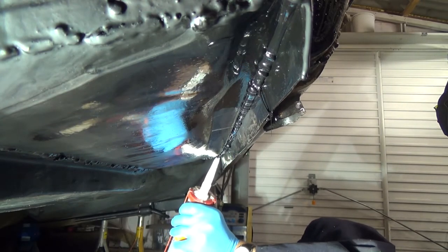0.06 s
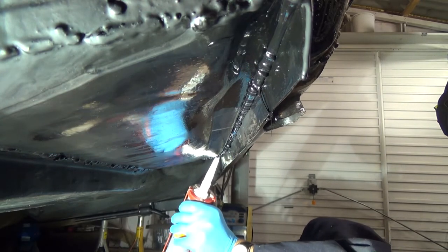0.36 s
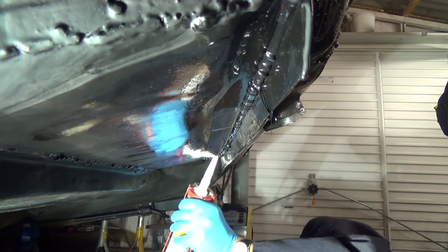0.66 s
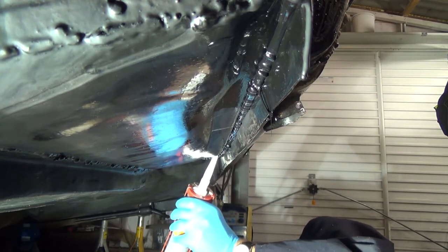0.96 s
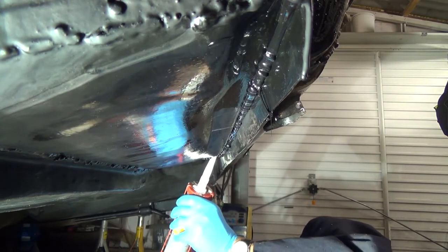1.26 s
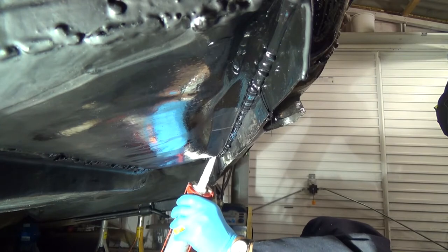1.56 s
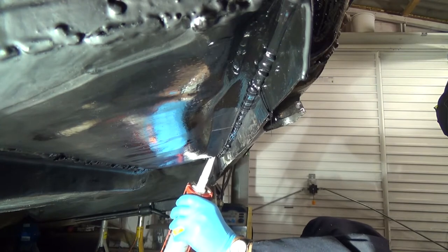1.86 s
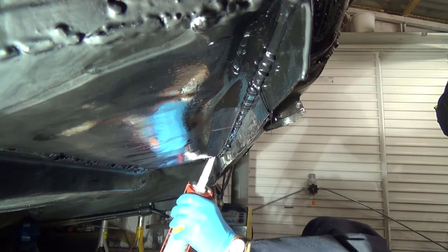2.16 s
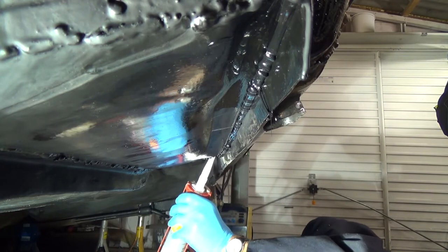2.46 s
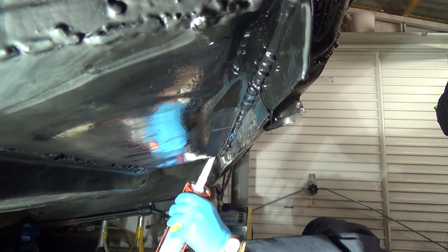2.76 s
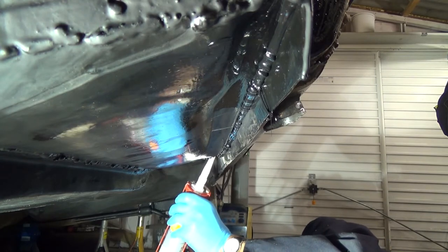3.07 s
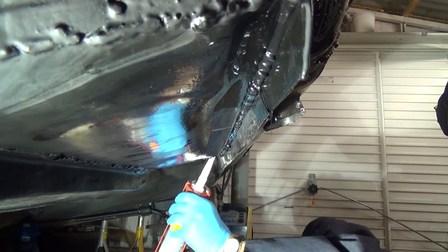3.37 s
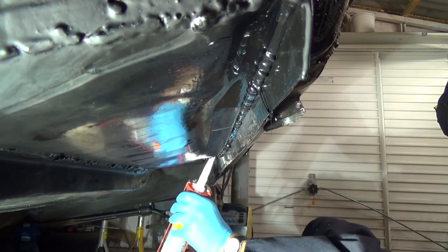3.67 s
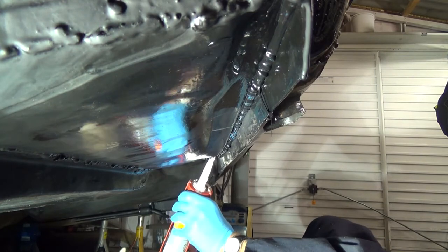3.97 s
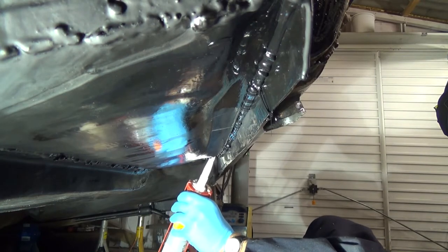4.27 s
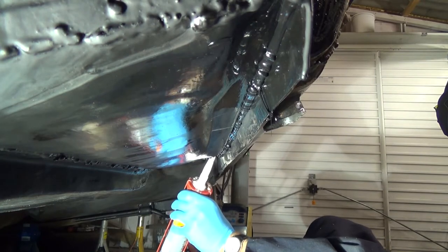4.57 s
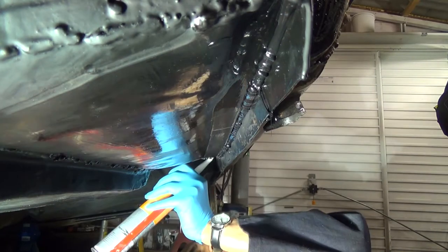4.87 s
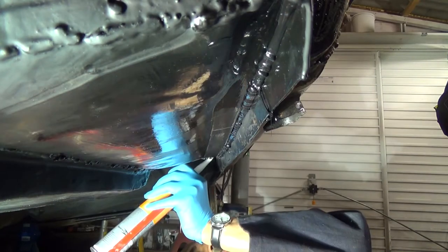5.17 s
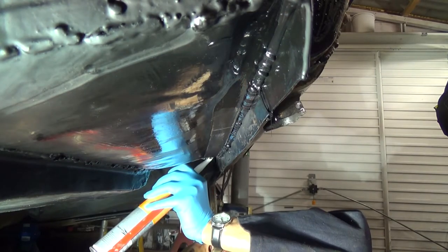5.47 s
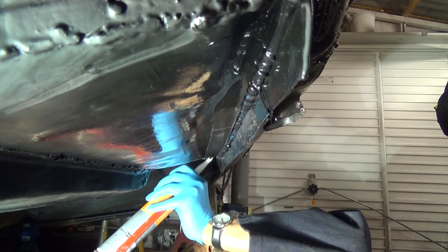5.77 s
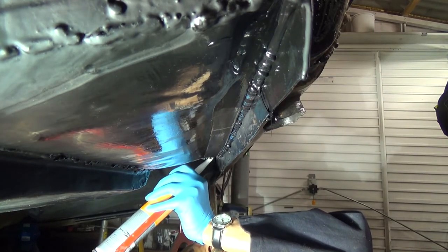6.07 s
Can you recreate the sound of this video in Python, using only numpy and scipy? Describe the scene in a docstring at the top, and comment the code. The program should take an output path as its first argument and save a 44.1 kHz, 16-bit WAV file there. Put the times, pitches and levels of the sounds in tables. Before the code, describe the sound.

Close by in a quiet garage, a hand-lever cartridge gun pushes sealant into a seam under a car. The paste hisses and crackles in soft spurts, air pockets pop, the nozzle rubs along metal and the lever clicks sharply. Past the middle, the push rod lets go with one loud metallic snap and a soft, low panel boom. A small squeak and a tick follow over a faint fan hum.

```python
"""Sealant gun under a car

A hand-lever cartridge gun lays sealant into a seam in a quiet garage. Paste hisses and crackles out
in spurts as its air cells tear open; the nozzle rubs along the metal and the lever clicks.
The push rod catches with a chirp, later lets go with a loud snap that rings the steel frame.
The pushed body panel booms, a rubber glove crinkles, a fan hums behind."""
import sys
import numpy as np
from scipy import signal
from scipy.fft import rfft, irfft, next_fast_len
from scipy.io import wavfile

SR = 44100
rng = np.random.default_rng(int(sys.argv[2]) if len(sys.argv) > 2 else 0)


def store_wav(level_fs):
    """Save 16-bit WAV to argv[1]."""
    pcm = np.round(np.clip(np.atleast_2d(level_fs), -1, 1) * 32767)
    wavfile.write(sys.argv[1], SR, pcm.T.astype(np.int16))


N = 278712
TIME = np.arange(N) / SR

# plunger pushes: (start [s], length [s], attack [s], level [dB], sputter share [0-1])
PASTE_SPURTS = [(0.121, 0.18, 0.035, -48, 0.25), (0.37, 0.083, .04, -69, .5), (1.025, .14, 0.048, -72, .7),
                (1.228, 0.18, .03, -60, 0.57), (1.82, .25, .13, -57, 0.55), (2.022, 0.21, .11, -48.5, 0.1),
                (2.2, 0.507, 0.073, -56, 0.23), (2.495, 0.17, .08, -57, .2), (2.679, .29, .1, -54, .15),
                (3.0, 0.42, .04, -72.5, 0.4), (3.437, .27, 0.015, -62, 0.05), (3.74, 0.22, .1, -53.5, 0.14),
                (3.948, 0.36, 0.045, -69, .1), (4.109, 0.12, 0.086, -57, .1), (4.32, .21, .08, -59.5, 0.14)]
# nozzle on the seam: (start [s], length [s], level [dB])
NOZZLE_DRAGS = [(0.265, 0.053, -61.5), (1.826, 0.056, -63), (1.9, 1.44, -73), (2.17, 0.047, -61.5),
                (2.55, 0.47, -67.5), (3.455, .585, -64.5), (4.195, 0.036, -70.5), (4.28, .29, -62.5)]
# large air pockets bursting: (time [s], level [dB])
LARGE_POPS = [(0.442, -44), (0.659, -44), (1.0668, -41.5), (1.1074, -36.5), (1.1132, -37), (1.253, -39),
              (1.2894, -43), (1.3286, -37), (1.3688, -34.5), (1.376, -34), (1.3923, -27), (1.545, -46.5),
              (1.703, -45.5), (1.93, -36), (2.1047, -30), (3.1148, -46), (3.2904, -45.5), (3.675, -36.5),
              (4.1766, -38), (5.1865, -48.5), (5.5223, -40), (5.6687, -26)]
# lever contacts: (time [s], level [dB], low edge [Hz], high edge [Hz], seating blow re click [dB])
LEVER_CLICKS = [(0.2859, -28.5, 2980, 13000, 4.5), (1.8354, -39, 150, 9000, -15),
                (1.899, -35.5, 250, 7100, -13), (2.577, -39.5, 600, 4500, -15),
                (2.6478, -35, 1500, 8050, -14), (2.7402, -28.5, 2400, 9500, -25),
                (2.7928, -34.5, 1200, 7000, -15), (2.858, -38.5, 1000, 5000, -13),
                (3.0024, -40, 2500, 9000, -15), (3.352, -47.5, 400, 4000, -8),
                (3.4552, -28, 1780, 14800, -5.5), (3.483, -40, 600, 4000, -4), (3.9956, -36, 450, 7900, 3),
                (4.2744, -34.5, 400, 11500, -15), (5.6404, -47, 2500, 16000, 11.5)]
# slip and blows of the rod's release: (time [s], level [dB], low-pass [Hz])
SNAP_BLOWS = [(4.5714, -30.5, 12100), (4.5736, -6, 2110), (4.574, -25.5, 14000), (4.5799, -25, 12200),
              (4.5817, -7, 17000)]
# steel frame and push rod resonances: (frequency [Hz], level [dB], t60 [s])
FRAME_MODES = [(630, -27.5, 0.045), (1359, -11, 0.044), (1960, -11, 0.043), (2900, -13.5, 0.046),
               (4320, -16.5, .075), (4820, -14, 0.048), (5554, -19, 0.071), (6710, -15, 0.089),
               (7150, -7.5, 0.045), (7760, -14, 0.055), (8400, -12, .05), (8830, -7.5, 0.05),
               (9880, -9.5, 0.041), (11600, -14, .045)]
ROD_MODES = [(3280, -21, 0.032), (3370, -46, .15), (4830, -45.5, .17), (5280, -29, 0.037), (6260, -49, .07),
             (8180, -34.5, .04), (9980, -45, 0.045), (12600, -43, 0.046)]
# slack gun being turned: (time [s], level [dB], pitch [Hz], rise [s], t60 [s])
GUN_SQUEAKS = [(5.637, -52.5, 1994, 0.012, 0.39), (5.643, -46, 3930, 0.012, 0.068),
               (5.69, -58, 2180, 0.033, 0.31), (5.7, -63, 1636, 0.026, 0.27)]
# air leaving the cartridge: (time [s], level [dB], pitch [Hz], half length [s])
AIR_WHISTLES = [(0.51, -68.5, 7290, .025), (0.945, -74, 6810, 0.05), (1.176, -70, 7330, .03)]
# dull knocks and shuffles: (time [s], level [dB], t60 [s])
WORK_SHUFFLES = [(0.725, -61, 0.35), (1.875, -60.5, 0.24), (2.2, -71, 0.2), (2.82, -62, 0.35),
                 (3.72, -64, 0.13), (5.701, -62, 0.32), (6.245, -66, 0.23)]
# pushes on the body panel: (time [s], level [dB], rise [s], t60 [s])
PANEL_BOOMS = [(0.455, -62, 0.018, 0.27), (1.35, -71, 0.068, .4), (1.92, -61, 0.095, 0.39),
               (4.05, -65.5, 0.028, 0.33), (4.56, -58, 0.045, .2), (4.591, -46, 0.021, .45),
               (4.642, -47, .014, 0.18)]
# fan hum swell: (time [s], gain [dB])
FAN_GAIN = [(0.5, -1.5), (.9, 2.5), (3.1, 2), (4.6, -3.5), (6.32, -6)]
# electrical hum and whine: (frequency [Hz], level [dB], pitch wander [Hz])
HUM_LINES = [(203, -84.5, 1.5), (299.5, -81, 1.16), (7700, -92.5, 54), (15625, -80.5, 25)]
# spectral shapes: (frequency [Hz], relative density [dB])
HISS_SPECTRUM = [(1500, -18), (2500, -11.5), (3500, -4.5), (4900, -4), (5600, -4.5), (6500, -4.5),
                 (7400, -3), (9000, -0.5), (11100, 0.5), (12500, -3.5), (14000, -9), (15800, -12.5)]
RUB_SPECTRUM = [(120, -1.5), (300, -1.5), (700, 0), (1100, -1), (1900, -1), (3100, -1.5), (5000, -5),
                (8000, -12), (14000, -33.5)]
POP_SPECTRUM = [(800, -25), (3000, -7), (5000, -3), (7500, 5.5), (11000, 2), (15500, -2)]
CLICK_SPECTRUM = [(200, -14), (800, -9.5), (2200, -3.5), (3600, 1.5), (5200, 0), (7500, -7.5), (10500, 5),
                  (15500, -15)]
CRACK_SPECTRUM = [(200, -12.5), (800, -16.5), (1500, -6.5), (3600, -1), (5000, 2), (6100, -10), (7200, 2.5),
                  (12300, 4.5), (14000, -1.5), (16000, -5.5)]
UNDERBODY_SPECTRUM = [(250, 1), (400, -13), (630, -1.5), (950, -9.5), (1750, 4), (2500, -5.5), (3800, -3.5),
                      (4800, 2), (6200, -5), (7000, 3), (9500, -2.5), (12500, -6), (15000, -20)]
SHUFFLE_SPECTRUM = [(150, -27), (450, 5.5), (750, 4), (1400, -5), (3000, -7.5), (9000, -19.5)]
BOOM_SPECTRUM = [(48, -9), (60, 0), (85, -2), (120, -8), (163, 4.5), (190, -8), (215, -6), (260, -17),
                 (500, -23), (1200, -49)]
GLOVE_SPECTRUM = [(4000, -12.5), (7500, -7.5), (9700, -0.5), (11000, -4), (15000, -8.5)]
AIR_SPECTRUM = [(15, -42), (25, -12), (59, -8), (90, -5), (125, -6.5), (196, -8), (271, -12), (301, -9),
                (326, -15.5), (394, -12.5), (856, -15), (1180, -16), (4260, -22.5), (9520, -23),
                (15000, -27.5)]
# stereo width, close and diffuse: (frequency [Hz], side re mid [dB])
NEAR_WIDTH = [(110, -23), (380, -17.5), (1000, -14), (4400, -14), (8100, -16.5), (15000, -39)]
ROOM_WIDTH = [(110, -21.5), (200, -14.5), (380, -8.5), (1000, -4), (4400, -6.5), (8100, -13), (15000, -30)]

SMALL_POPS_PER_S, SMALL_POP_DB, SMALL_POP_SPREAD_DB = 6, -55, 2.5
SEAT_S, BOUNCE_S, BOUNCE_DB = .0046, .011, -12
CATCH_S, RELEASE_S, RING_STOP_S, REGRIP_S = 3.4585, SNAP_BLOWS[-1][0], 4.683, 5.57
GARAGE_T60_S = 0.23
CUTOFF_HZ = 15850


def paste():
    """Each push tears fine air cells open at the nozzle; airy paste sputters; the nozzle rubs."""
    smooth_power, sputter_power = np.zeros((2, N))
    for start_s, length_s, attack_s, db, share in PASTE_SPURTS:
        power = (from_db(db) * stroke(start_s, length_s, attack_s, t60_s=.18, rise_db=2)) ** 2
        smooth_power += (1 - share) * power
        sputter_power += share * power
    flutter = from_db(.8 * drift(35))
    smooth = np.sqrt(smooth_power) * stereo_noise(NEAR_WIDTH)
    sputter = np.sqrt(sputter_power) * crackle(per_s=1500, spread_db=5)
    hiss = colour(smooth + sputter, HISS_SPECTRUM)
    return flutter * (hiss + nozzle_rub(smooth_power + sputter_power))


def nozzle_rub(paste_power):
    """The nozzle drags along the seam; the emerging bead always rubs a little."""
    power = from_db(-14.5) ** 2 * paste_power
    for start_s, length_s, db in NOZZLE_DRAGS:
        power += (from_db(db) * stroke(start_s, length_s, attack_s=.023, t60_s=.6, rise_db=-.5)) ** 2
    friction = .95 * stereo_noise() + .65 * crackle(per_s=600, spread_db=4)
    return np.sqrt(power) * colour(friction, RUB_SPECTRUM)


def pops():
    """Air pockets burst: large ones at set times, small ones at random under pressure."""
    pressed = (TIME > PASTE_SPURTS[0][0]) & (TIME < RELEASE_S)
    onsets = pressed & (rng.random(N) < SMALL_POPS_PER_S / SR)
    small = onsets * from_db(SMALL_POP_DB + SMALL_POP_SPREAD_DB * rng.standard_normal(N))
    bursts = signal.oaconvolve(small, pocket_burst())[:N]
    for time_s, db in LARGE_POPS:
        add(bursts, time_s + .0007, from_db(db) * pocket_burst())
    return colour(bursts, POP_SPECTRUM)


def pocket_burst():
    """One sharp tick, then a brief spatter."""
    burst = .214 * rattle(t60_s=.017)
    burst[0] = 1.4
    return burst


def lever():
    """The lever clicks, takes up its play and rebounds once; the hand damps the frame's ring."""
    knocks = np.zeros(N)
    for time_s, db, low_hz, high_hz, seat_db in LEVER_CLICKS:
        highpass = signal.butter(1, low_hz, "high", fs=SR)
        for delay_s, gain_db in (0, 0), (SEAT_S, seat_db), (SEAT_S + BOUNCE_S, seat_db + BOUNCE_DB):
            contact = signal.lfilter(*highpass, rattle(t60_s=.036))
            add(knocks, time_s + delay_s, from_db(db + gain_db - 5) * soften(contact, high_hz))
    frame = sum(from_db(db) * ring(knocks, hz, t60_s=.012) for hz, db, _ in FRAME_MODES)
    return colour(knocks + .08 * frame, CLICK_SPECTRUM)


def rod_snap():
    """The loaded rod jumps free: a crack, frame ring, then a wash and late buzz from the underbody."""
    blows, crack = np.zeros((2, N))
    for time_s, db, lowpass_hz in SNAP_BLOWS:
        add(blows, time_s, from_db(db) * soften(signal.unit_impulse(SR // 50), lowpass_hz))
        add(crack, time_s, from_db(db - 6) * soften(rattle(t60_s=.032), lowpass_hz))
    frame = sum((-1) ** k * from_db(db - 6.5) * ring(blows, hz, t60_s)
                for k, (hz, db, t60_s) in enumerate(FRAME_MODES))
    wash_gain = from_db(-34) * swell(RELEASE_S + .012, rise_s=.006, t60_s=.25)
    buzz_gain = from_db(-50) * swell(RELEASE_S + .078, rise_s=.027, t60_s=.36)
    wash = wash_gain * colour(stereo_noise(), UNDERBODY_SPECTRUM)
    buzz = buzz_gain * tone(1700, waver=.025, shake=.42)
    return widen(colour(crack, CRACK_SPECTRUM) + frame) + wash + buzz


def rod_chirp():
    """The rod sticks in its catch; friction builds its ring within a few ms."""
    return sum(from_db(db) * swell(CATCH_S, .0019, t60_s) * tone(hz, waver=.00535, shake=.329)
               for hz, db, t60_s in ROD_MODES)


def squeaks():
    """The slack gun squeaks roughly as it is turned."""
    return sum(from_db(db) * swell(time_s, rise_s, t60_s) * tone(hz, waver=.03, shake=.31)
               for time_s, db, hz, rise_s, t60_s in GUN_SQUEAKS)


def whistles():
    """Air whistles thinly out of the cartridge."""
    return sum(from_db(db) * np.exp(-((TIME - time_s) / half_s) ** 2) * tone(hz, waver=.0118, shake=.5)
               for time_s, db, hz, half_s in AIR_WHISTLES)


def panel_booms():
    """The body panel booms low when pushed."""
    gain = sum(from_db(db) * swell(time_s, rise_s, t60_s) for time_s, db, rise_s, t60_s in PANEL_BOOMS)
    return gain * colour(stereo_noise(), BOOM_SPECTRUM)


def shuffles():
    """Dull handling noise of the work."""
    gain = sum(from_db(db) * swell(time_s, .018, t60_s) for time_s, db, t60_s in WORK_SHUFFLES)
    return gain * colour(stereo_noise(), SHUFFLE_SPECTRUM)


def glove():
    """Stretched rubber ticks faintly throughout, louder as the grip shifts."""
    ticks = colour(crackle(per_s=290, spread_db=3.5), GLOVE_SPECTRUM)
    stretch = from_db(-81.5) + from_db(-75) * swell(REGRIP_S, rise_s=.09, t60_s=3.2)
    return stretch * widen(ticks)


def garage(x, wet_db):
    """Direct sound plus a diffuse tail from underbody and walls."""
    t = np.arange(SR // 2) / SR
    build_up = 1 - np.exp(-t / .0054)
    tail = stereo_noise(size=len(t)) * np.exp(-np.log(1000) * t / GARAGE_T60_S) * build_up
    tail /= np.sqrt(np.sum(tail ** 2) / 2)
    return widen(x) + from_db(wet_db) * signal.fftconvolve(x[None], tail, axes=1)[:, :N]


def fan():
    """A wavering fan hum that swells and sinks."""
    gain_db = np.interp(TIME, *np.transpose(FAN_GAIN)) + 1.1 * drift(7)
    return from_db(gain_db) * hum_line(hz=93.5, db=-72.5, wander_hz=7.7)


def room_tone():
    """Room air with electrical hum and whine; the level wanders slightly."""
    air = from_db(-68) * colour(stereo_noise(), AIR_SPECTRUM)
    hum = sum(hum_line(*line) for line in HUM_LINES)
    return (air + hum) * from_db(.67 * drift(2.2))


def hum_line(hz, db, wander_hz):
    """Sine of rms level db with wandering pitch."""
    phase = 2 * np.pi * np.cumsum(hz + wander_hz * drift(3 * wander_hz)) / SR
    return from_db(db) * np.sqrt(2) * np.sin(phase)


def tone(hz, waver, shake):
    """Sine with random pitch waver and amplitude shake, both as rms fractions."""
    phase = 2 * np.pi * hz * np.cumsum(1 + waver * drift(200)) / SR
    return np.sin(phase) * (1 + shake * drift(120))


def rattle(t60_s):
    """A contact as a dense, decaying burst of tiny impacts."""
    t = np.arange(SR // 5) / SR
    return rng.standard_normal(len(t)) * np.exp(-np.log(1000) * t / t60_s)


def crackle(per_s, spread_db):
    """Random impulses of very uneven size; rms 1."""
    sizes = from_db(spread_db * np.minimum(rng.exponential(1, N), 4)) * rng.choice([-1, 1], N)
    return rms_one(sizes * (rng.random(N) < per_s / SR))


def stereo_noise(width=ROOM_WIDTH, size=N):
    """White mid noise plus side noise shaped by a width table."""
    mid, side = rfft(rng.standard_normal((2, size)))
    side_gain = from_db(at_hz(width, np.linspace(0, SR / 2, len(mid))))
    return irfft(mid + side_gain * side * [[1], [-1]], size)


def drift(rate_hz):
    """Slow random wander; rms 1."""
    step = 24
    coarse = rng.standard_normal(next_fast_len(N // step + 2))
    hz = np.fft.rfftfreq(len(coarse), step / SR)
    slow = rms_one(irfft(rfft(coarse) / (1 + (hz / rate_hz) ** 2), len(coarse)))
    return np.interp(np.arange(N) / step, np.arange(len(slow)), slow)


def stroke(start_s, length_s, attack_s, t60_s, rise_db):
    """Envelope: opens, changes by rise_db while held, decays."""
    t = TIME - start_s
    opening = np.sin(np.pi / 2 * np.clip(t / attack_s, 0, 1)) ** 2
    held_db = rise_db * (np.clip(t / length_s, 0, 1) - .5)
    decay_db = 60 * np.clip((t - length_s) / t60_s, 0, 2)
    return opening * from_db(held_db - decay_db)


def swell(peak_s, rise_s, t60_s):
    """Envelope: Gaussian rise to 1, exponential decay."""
    t = TIME - peak_s
    exponent = np.where(t < 0, (t / rise_s) ** 2, np.log(1000) * t / t60_s)
    return np.exp(-np.minimum(exponent, 40))


def ring(x, hz, t60_s):
    """Resonator: a unit click starts a decaying sine of height 1."""
    radius, angle = from_db(-60 / (t60_s * SR)), 2 * np.pi * hz / SR
    return signal.lfilter([0, np.sin(angle)], [1, -2 * radius * np.cos(angle), radius ** 2], x + 1e-18)


def soften(x, hz):
    """Low-pass: a softer contact holds less treble."""
    return signal.sosfilt(signal.butter(2, min(hz, .45 * SR), fs=SR, output="sos"), x)


def colour(x, spectrum):
    """Minimum-phase filter of unit power gain; rolls off below the first point."""
    size = 8192
    hz = np.fft.rfftfreq(size, 1 / SR)
    gain = rms_one(from_db(at_hz(spectrum, hz)) * np.clip(hz / spectrum[0][0], .03, 1) ** 2)
    cepstrum = irfft(np.log(gain))
    cepstrum[1:size // 2] *= 2
    cepstrum[size // 2 + 1:] = 0
    response = irfft(np.exp(rfft(cepstrum)))
    return signal.oaconvolve(np.atleast_2d(x), response[None], axes=1)[:, :N].reshape(np.shape(x))


def widen(x):
    """Scatter off nearby metal differs left and right."""
    taps = 256
    hz = np.linspace(0, SR / 2, taps // 2 + 1)
    ripple = np.sqrt(2) * np.cos(np.cumsum(rng.normal(0, .5, len(hz))))
    scatter = irfft(1j * from_db(at_hz(NEAR_WIDTH, hz)) * ripple)
    side = signal.fftconvolve(x, np.fft.fftshift(scatter))[taps // 2:taps // 2 + len(x)]
    return x + side * [[1], [-1]]


def add(track, time_s, sound):
    """Mix a sound into a track."""
    at = round(time_s * SR)
    track[at:at + len(sound)] += sound[:N - at]


def at_hz(points, hz):
    """Interpolate a table over log frequency."""
    known_hz, values = np.transpose(points)
    return np.interp(np.log(hz + 1e-3), np.log(known_hz), values)


def from_db(db):
    """Decibels to gain."""
    return np.exp(np.asarray(db) * (np.log(10) / 20))


def rms_one(x):
    """Scale to rms 1."""
    return x / np.sqrt(np.mean(x ** 2) + 1e-20)


def scene():
    """The gun close and slightly left, the garage around it."""
    ring_gate = np.clip((RING_STOP_S - TIME) / .0019, 0, 1)   # snap and booms stop short
    handling = shuffles() + panel_booms() * ring_gate
    ticks = garage(pops(), wet_db=-16) + garage(lever(), wet_db=-11.5)
    squeals = garage(rod_chirp() + squeaks() + whistles(), wet_db=-17)
    gun = paste() + glove() + ticks + squeals + rod_snap() * ring_gate
    return gun * from_db([[.4], [-.4]]) + handling + room_tone() + fan()


def record(dry):
    """Soft clip, then a steep low-pass."""
    ceiling = .55
    rounded = ceiling * np.tanh(dry / ceiling)
    return signal.sosfilt(signal.ellip(12, .1, 80, CUTOFF_HZ, fs=SR, output="sos"), rounded)


dry = scene()
out = record(dry)
store_wav(out)
```